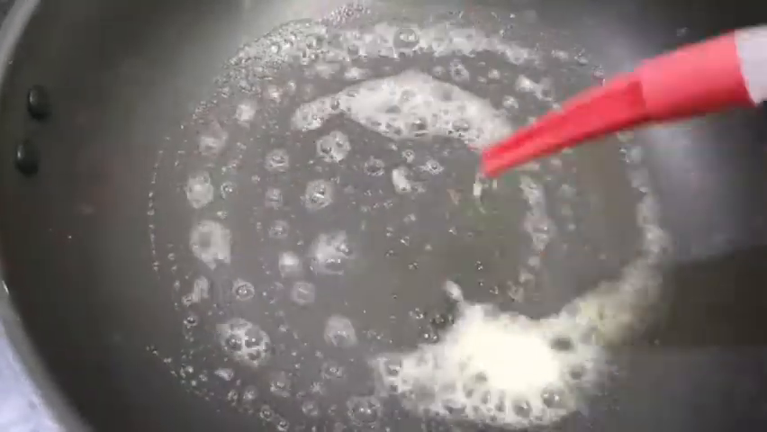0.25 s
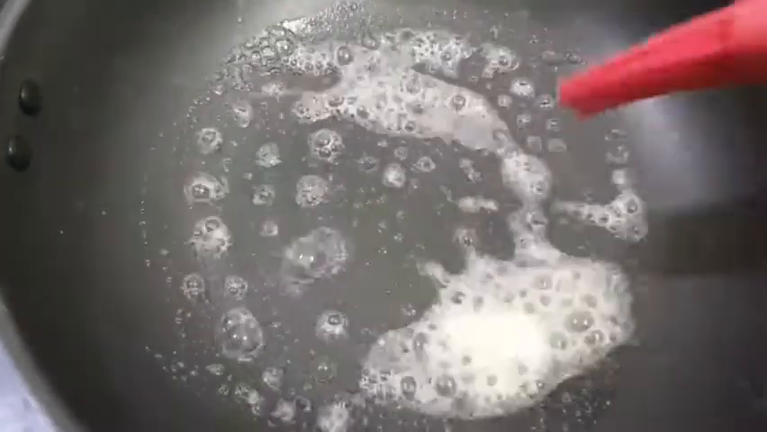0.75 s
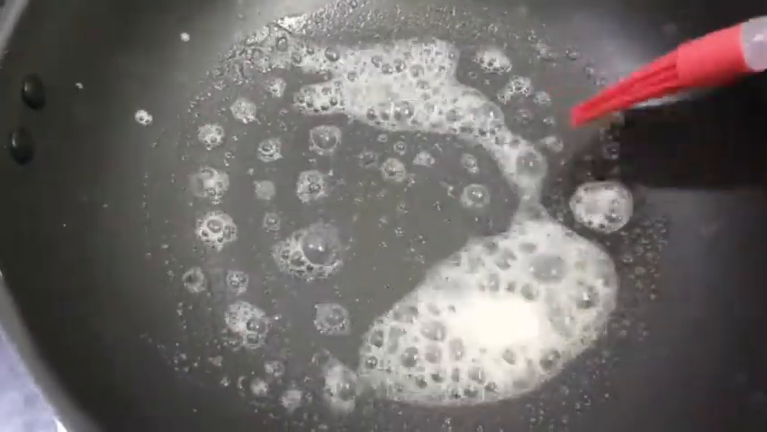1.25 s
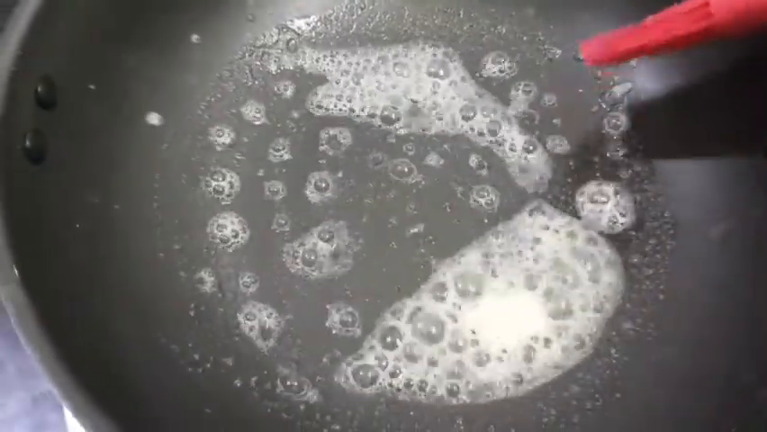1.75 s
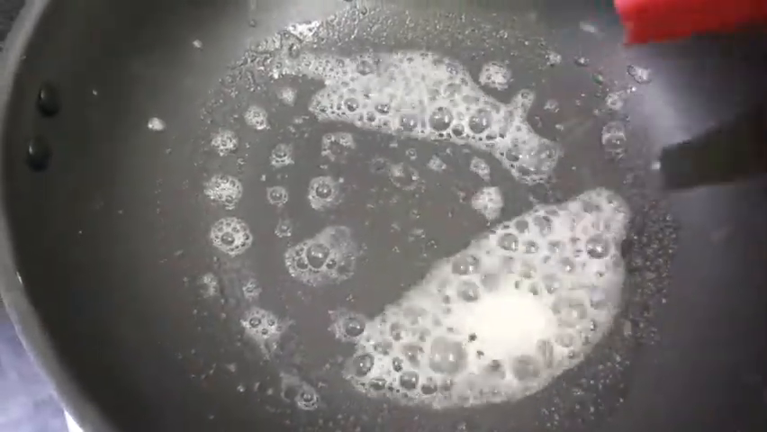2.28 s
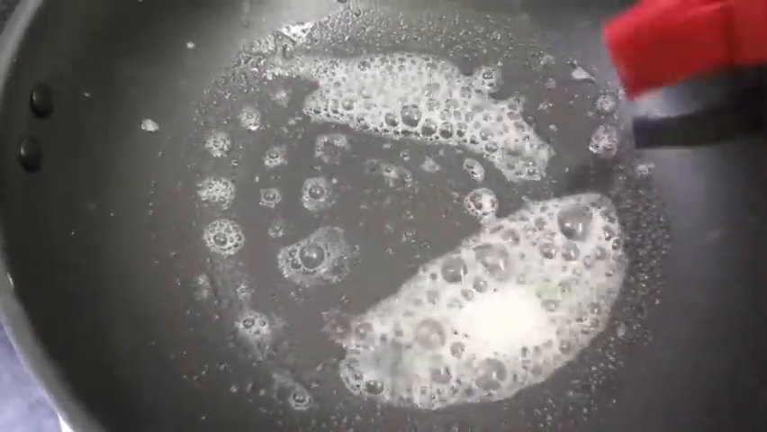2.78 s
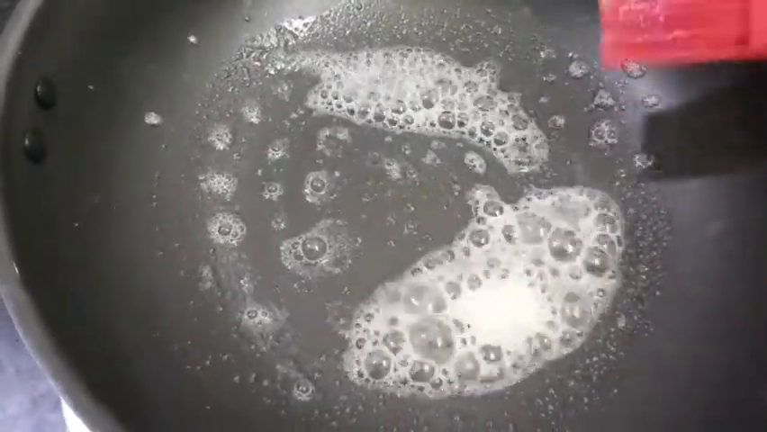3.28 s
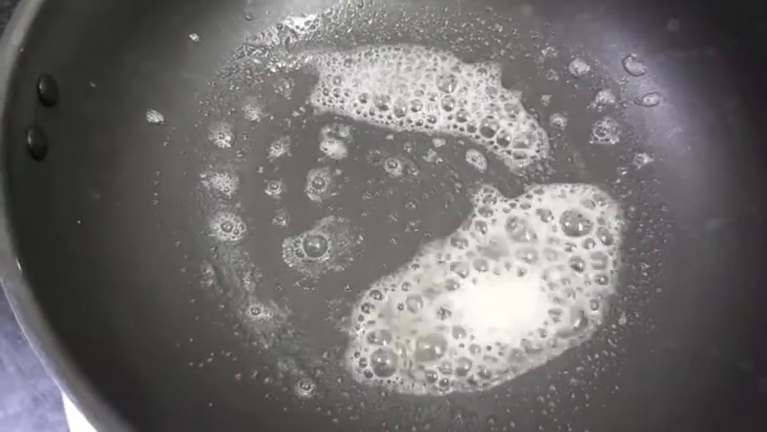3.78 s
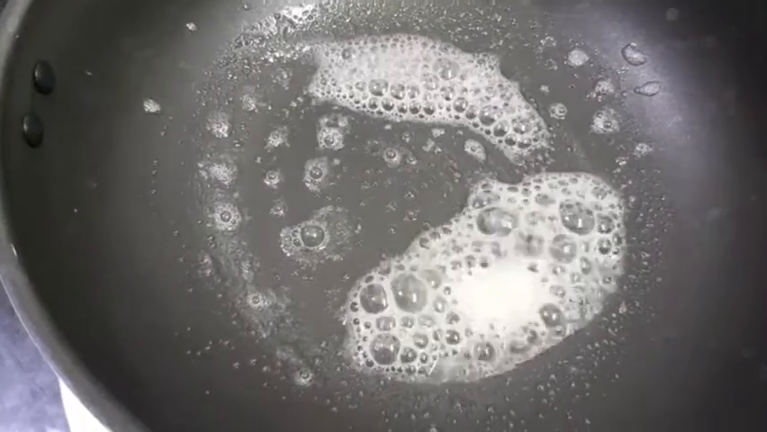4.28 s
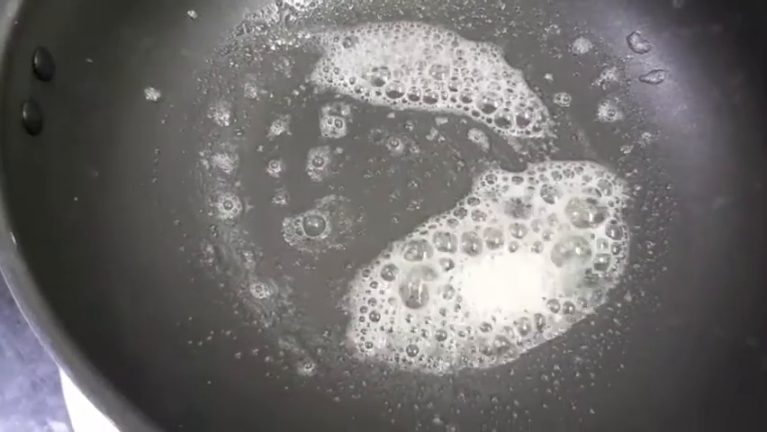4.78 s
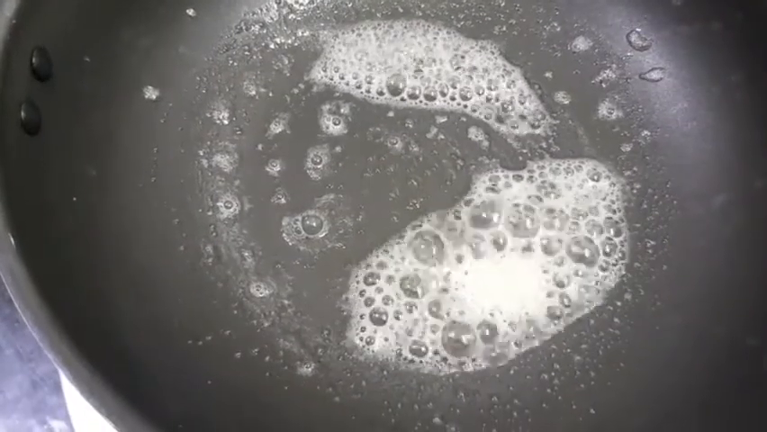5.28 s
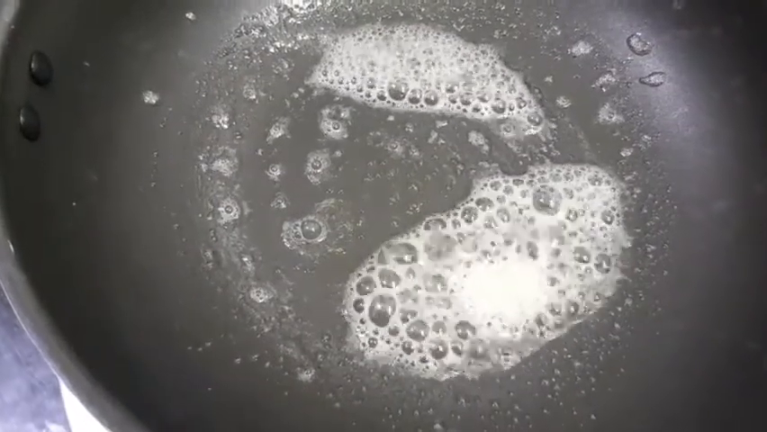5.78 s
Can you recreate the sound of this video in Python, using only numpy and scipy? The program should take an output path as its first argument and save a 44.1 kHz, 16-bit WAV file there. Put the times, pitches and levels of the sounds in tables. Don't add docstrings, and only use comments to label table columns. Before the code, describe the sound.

A close stereo microphone indoors hears butter foaming in a hot pan. From 0 to 1.4 seconds the sizzle is densest, bright and airy, strongest around 0.6, with tiny high snaps and crisp pops; a soft worktop bump falls near 0.36. The fizz then sinks, becoming thin by 3 seconds. Tongs strike the metal rim at about 1.57, 1.76, 1.96, 2.42 and 2.79 seconds: short hard clacks with brief pan ringing, the first loudest, the second brightest, the fourth softest and dull. A faint creak comes near 2.66. From 3 seconds, separate sharp pops crackle over gentle fizz, with small fat spatters at 3.5, 4.6, 5.65 and 5.9. A muffled bump sounds near 4.4. Throughout, a faint low motor hum and drone, swelling slightly around 1.9 and 5.7, and uneven floor rumble sit underneath, with little room echo. The sizzle lifts slightly at the end, near 6 seconds.

```python
import sys
import numpy as np
from scipy import signal
from scipy.fft import rfft, irfft, next_fast_len
from scipy.io import wavfile
from scipy.ndimage import map_coordinates

SR = 44100
rng = np.random.default_rng(int(sys.argv[2]) if len(sys.argv) > 2 else 0)


def amplitude_ratio(level_db):
    exponent = np.asarray(level_db, float) / 20
    return 10 ** exponent


def persist_wave(psi):
    counts = np.round(np.clip(psi, -1, 1) * 32767).astype(np.int16)
    wavfile.write(sys.argv[1], SR, np.atleast_2d(counts).T)


N = 266805

# t/s, peak level/dB, middle ring/dB, bright ring/dB, left-right/dB
KNOCK_EVENTS = [
    (1.5658, -7.5, 3, -4.5, 0),
    (1.7642, -9, 3, -1, 1),
    (1.9608, -9.5, -14, -11.5, 1),
    (2.415, -14, -8, -18, 1.5),
    (2.7898, -9, -3, -4, 1),
]


def unit(x):
    return x / np.sqrt(np.mean(x ** 2) + 1e-20)


def along(points, hz):
    f, v = np.transpose(points)
    return np.interp(np.log(hz + 1), np.log(f + 1), v)


def curves(rows):
    s, *cols = np.transpose(rows)
    return [np.interp(np.arange(N) / SR, s, c) for c in cols]


def wobble(rate_hz):
    knots = rng.standard_normal(int(N * rate_hz / SR) + 4)
    return map_coordinates(knots, [np.arange(N) * rate_hz / SR])


def coloured(x, spectrum):
    n = x.shape[-1]
    m = next_fast_len(n + 8192)
    gain = amplitude_ratio(along(spectrum, np.fft.rfftfreq(m, 1 / SR)))
    return irfft(rfft(x, m) * gain, m)[..., :n]


def rush(spectrum, alike):
    a, b = coloured(rng.standard_normal((2, N)), spectrum)
    turn = np.arccos(np.clip(alike, -1, 1)) / 2
    return unit(np.cos(turn) * a + np.sin(turn) * b * [[1], [-1]])


def sides(left_db, right_db):
    return amplitude_ratio([[left_db], [right_db]])


def bursts(s, hz, size, cycles, pan_db, lag_s):
    out = np.zeros((2, N + 512))
    k = np.arange(128)
    for ch, side in enumerate((.5, -.5)):
        at = np.clip(s - side * lag_s, 0, N / SR) * SR
        age_cycles = np.maximum(k - (at % 1)[:, None], 0) / SR * hz[:, None]
        ring = np.e * age_cycles / cycles * np.exp(-age_cycles / cycles) * np.sin(2 * np.pi * age_cycles)
        weighted = (size * amplitude_ratio(side * pan_db))[:, None] * ring
        place = at.astype(int)[:, None] + k
        out[ch] = np.bincount(place.ravel(), weighted.ravel(), N + 512)
    return out[:, :N]


def bubbles(count, low_hz, high_hz, spread_db, cycles, pan_db):
    when, pitch, size, place = rng.random((count, 4)).T
    hz = np.clip(low_hz * (high_hz / low_hz) ** pitch, 100, SR / 2.2)
    size = amplitude_ratio(-spread_db * np.log(1 - .99 * size))
    lag_s = .0001 + 0.000898 * (place - .5)
    return bursts(when * N / SR, hz, size, cycles, pan_db + 6 * (place - .5), lag_s)


def fizzing(crowd, fizz, side_db, spectrum):
    noise = fizz * sides(side_db, -side_db) * rng.standard_normal((2, N))
    return unit(coloured(unit(crowd) + noise, spectrum))


def foam():
    # t/s, fine bubble level/dB
    boil = [(0.0, -36), (0.32, -37), (0.6, -34), (1.43, -40), (2.59, -45.5), (2.9, -47), (3.3, -47),
            (3.87, -50), (4.72, -49), (5.46, -48.5), (5.91, -48), (6.05, -43)]
    # f/Hz, level/dB per Hz
    large_colour = [(3000, -45), (4000, -11.5), (4800, -8.5), (5500, -7.5), (6200, -4), (7000, -2),
                    (8300, -5.5), (10500, -7), (13000, -8), (20000, -120)]
    fine_colour = [(6000, -33), (9000, -4.5), (11000, -1), (12500, 2), (13900, 3.5), (15000, 3.5),
                   (16500, -4)]
    spit_colour = [(600, -14.5), (1000, -12.5), (1500, -10), (2000, -5.5), (2700, -3), (3400, -3.5),
                   (4000, -3), (4800, 1), (6500, -5.5), (10000, -120)]
    fine_db, = curves(boil)
    excess_db = fine_db + 48
    large_db = -43.5 + 0.47 * excess_db
    spit_db = -46 + 0.46 * excess_db
    flurry_db = .7 * wobble(45) + 1.4 * wobble(160)
    flurry_db = flurry_db * np.clip(1 - .04 * excess_db, .3, 1.1)
    large = bubbles(count=7000, low_hz=4790, high_hz=11000, spread_db=3.5, cycles=0.63, pan_db=9)
    fine = bubbles(count=12000, low_hz=8300, high_hz=17600, spread_db=3.0, cycles=1.0, pan_db=5)
    spit = bubbles(count=5000, low_hz=940, high_hz=3760, spread_db=5.0, cycles=0.41, pan_db=1.5)
    large = fizzing(large, .95, 3.2, large_colour)
    fine = fizzing(fine, .95, 1.7, fine_colour)
    spit = fizzing(spit, 3.18, 1.5, spit_colour)
    large = amplitude_ratio(large_db + flurry_db + .35 * wobble(35)) * large
    fine = amplitude_ratio(fine_db + 4.0 + flurry_db + .35 * wobble(40)) * fine
    return large + fine + amplitude_ratio(spit_db + 1.13 * flurry_db) * spit


def kitchen():
    # f/Hz, rms level/dB, unsteadiness/dB
    hum_lines = [(300.2, -54.5, 2.06), (116.9, -74.5, 8), (59, -68, 4.5)]
    # t/s, drone level/dB
    load = [
        (0.0, -56),
        (1.21, -57),
        (1.92, -51.5),
        (2.27, -55.5),
        (2.54, -54),
        (3.82, -56),
        (5.69, -50),
        (6.05, -51.5),
    ]
    # t/s, level over rumble/dB, half length/s
    steps = [(0.055, 8, .1), (0.97, 10, 0.031), (1.6, 6.5, 0.36), (1.95, 8.5, 0.18), (2.512, 13, 0.047),
             (2.883, 17.5, 0.12), (3.527, 11, 0.056), (3.754, 11, 0.041), (4.156, 11, .12),
             (5.304, 11, 0.13), (5.7, 8.5, 0.71)]
    # f/Hz, level/dB per Hz
    drone_colour = [(100, -32), (150, -10), (200, -9.5), (260, -5), (350, -1.5), (430, -4), (550, -6),
                    (680, -11), (1000, -12.5), (1400, -15.5), (2000, -20), (3000, -120)]
    # f/Hz, level/dB per Hz
    rumble_colour = [(15, -45), (25, -27), (47, -5), (103, -1), (122, -0.5), (145, -16), (160, -6),
                     (210, -56), (350, -120)]
    t = np.arange(N) / SR
    hum = 0
    for hz, db, loose_db in hum_lines:
        level = np.sqrt(2) * amplitude_ratio(db + loose_db * wobble(12))
        hum = hum + level * np.sin(2 * np.pi * hz * t + 0.38 * wobble(9.2))
    drone_db = 3 + curves(load)[0]
    drone = amplitude_ratio(drone_db + 1.06 * wobble(9)) * rush(drone_colour, alike=0.66)
    lumps_db = np.max([db * np.exp(-((t - s) / half_s) ** 2) for s, db, half_s in steps], axis=0)
    rumble_db = -65.5 + 0.78 * t + lumps_db
    rumble = amplitude_ratio(rumble_db) * unit(amplitude_ratio(0.46 * wobble(7)) * rush(rumble_colour, alike=0.95))
    return (hum + rumble) * sides(.6, -.6) + drone * sides(1.2, -1.2)


def singles():
    # t/s, peak level/dB, cavity f/Hz, film snap/dB
    loud_pops = [(0.1, -23, 9430, -12), (0.3006, -17, 7700, -15), (0.412, -17, 9100, -13),
                 (0.9302, -22, 8010, -8), (1.8222, -26, 6720, -3), (1.922, -22.5, 9200, -7),
                 (2.0552, -28, 6700, -19), (2.7222, -28.5, 10000, -4), (2.8754, -29, 6930, -10),
                 (3.0729, -28, 6530, -18), (3.1833, -17, 7700, -14), (3.3805, -25, 6470, -20),
                 (3.5082, -19, 7060, -25), (3.8743, -23.5, 6550, -24), (3.9656, -28, 5930, -11),
                 (4.2107, -20, 7300, -16), (4.285, -28, 6100, -11), (4.4747, -27, 7040, -10),
                 (4.591, -23, 9520, -14), (4.6623, -25.5, 6050, -15), (4.7255, -23.5, 7050, -14),
                 (4.8183, -37, 7150, -6), (5.002, -25, 6900, -15), (5.1277, -21, 6740, -24),
                 (5.3948, -28.5, 6900, -17), (5.5189, -27, 6630, -15), (5.6315, -18.5, 6640, -2.5),
                 (5.6769, -20, 7200, -10), (5.9242, -20, 9900, -13), (5.9904, -20.5, 7350, -14)]
    pan_db = 10
    loud = [(*row, pan_db) for row in loud_pops]
    smacks = [(s + 0.000823, db + bright_db - 1, 6440, -18, side_db + 5.0)
              for s, db, _, bright_db, side_db in KNOCK_EVENTS]
    when, size, pitch, film, place = rng.random((90, 5)).T
    lesser = [when * N / SR,
              -38 - 4.5 * np.log(1 - 0.96 * size),
              7000 * (1.0 + .24 * pitch),
              -11 + 8 * (film - .5),
              pan_db + 9 * (place - .5)]
    return np.concatenate([np.transpose(loud), np.transpose(smacks), lesser], axis=1)


def pops():
    # t/s, peak level/dB, f/Hz
    tiny_snaps = [(0.2603, -23, 13600), (0.3651, -18, 13900), (0.5352, -20, 14100), (0.7966, -21, 14900),
                  (0.85, -24, 12100), (0.9128, -20, 13500), (0.9951, -23, 12100), (1.1583, -14, 13600),
                  (1.2296, -23, 15600), (1.3254, -18, 13400), (1.5349, -27, 14000), (2.0218, -25, 14300),
                  (2.146, -27, 12500), (2.2283, -23, 13600), (2.3685, -19, 15600), (2.4264, -17, 12000),
                  (3.1453, -28, 14300), (3.3513, -22, 13700), (4.0267, -24, 12300), (4.4293, -31, 11900),
                  (4.5475, -27, 11600), (4.6084, -24, 14100), (4.7421, -32, 12300), (4.811, -22, 14300),
                  (5.302, -21, 13900), (5.4326, -21.5, 12200), (5.7618, -25, 14300), (5.9252, -29, 12500)]
    s, db, hz, snap_db, pan_db = singles()
    chance = rng.random((len(s), 3, 4))
    direct = 0
    for step, step_db in enumerate((-5, -3, -7)):
        late, pitch, film, lag = chance[:, step].T
        at = s + 0.000522 + 0.000406 * (step + late)
        lag_s = .0001 + 0.0005 * (lag - .5)
        tear_db = db + step_db
        cavity = bursts(at, hz * (.9 + .2 * pitch), amplitude_ratio(tear_db + 2.5), 0.86, pan_db + 6.0, lag_s)
        snap = bursts(at, 11000 + 4500 * film, amplitude_ratio(tear_db + snap_db + 16.5), 1.5, pan_db - 7.0, lag_s)
        click = bursts(at, 2500 + 2500 * lag, amplitude_ratio(tear_db - 16), 0.44, pan_db + 8.5, lag_s)
        direct = direct + cavity + snap + click
    s, db, hz = np.transpose(tiny_snaps)
    place = rng.random(len(s)) - .5
    direct = direct + bursts(s + 0.00052, hz, amplitude_ratio(db + 4.5), 1.75, 4 + 3 * place, .0001 + 0.0003 * place)
    pan_wall = amplitude_ratio(-11) * np.roll(direct, round(.0026 * SR), axis=1)
    return direct + pan_wall + amplitude_ratio(-16) * walls(direct)


def walls(x):
    # f/Hz, t60/s
    wall_t60 = [(300, 0.82), (1500, 0.25), (6000, 0.38), (12000, 0.07)]
    hz, t, z = signal.stft(rng.standard_normal((2, SR // 2)), SR, nperseg=256)
    decay = amplitude_ratio(-60 * t / along(wall_t60, hz)[:, None])
    tail = signal.istft(z * decay, SR, nperseg=256)[1]
    delayed = np.pad(x, ((0, 0), (300, 0)))
    return signal.fftconvolve(delayed, tail / np.linalg.norm(tail[0]), axes=1)[:, :x.shape[1]]


def bumps():
    # t/s, level/dB, t60/s
    bump_events = [
        (.36, -41, 0.077),
        (4.375, -42.5, 0.39),
    ]
    # f/Hz, level/dB per Hz
    worktop = [(120, -44), (200, -13), (360, -2.5), (705, -9), (780, -12), (895, -6.5), (1800, -22),
               (2340, -55), (3960, -120)]
    # t/s, half length/s, f/Hz, level/dB
    creak = (2.66, .06, 418, -47)
    out = np.zeros(N + SR)
    t = np.arange(SR // 4) / SR
    for s, db, t60 in bump_events:
        thud = unit(coloured(rng.standard_normal(len(t)), worktop))
        envelope = amplitude_ratio(db - 60 * t / t60) * (1 - np.exp(-t / 0.0021))
        out[round(s * SR):][:len(t)] += envelope * thud
    s, half_s, hz, db = creak
    t = np.arange(N) / SR - s
    swell = amplitude_ratio(db + 0.96 * wobble(29.3)) * np.exp(-(t / half_s) ** 2)
    return out[:N] + swell * np.sin(2 * np.pi * hz * t)


def tongs_contact(t, scuff, bright_db):
    # f/Hz, level/dB, t60/s
    tongs_modes = [(733, -16.5, 0.035), (1264, -4.5, 0.045), (1650, -14, 0.023), (1950, -2.5, 0.024),
                   (2675, 0.5, 0.021), (3210, -1, 0.027)]
    scrape = (0.56 * scuff[0] + 0.68 * scuff) * t / 0.0016 * np.exp(-t / 0.0019)
    port_t = t - [[0], [.0001]]
    clack = sum(amplitude_ratio(db - 60 * t / t60) * np.sin(2 * np.pi * hz * port_t) for hz, db, t60 in tongs_modes)
    clack = clack * (1 - np.exp(-t / 0.00076))
    contact = (amplitude_ratio(-5) * scrape + amplitude_ratio(-7) * clack) * sides(3, -3)
    bounce = np.roll(contact, round(.0185 * SR), axis=1)
    return contact + amplitude_ratio(-9 + 0.73 * bright_db) * bounce


def knocks():
    # f/Hz, level/dB, t60/s
    pan_modes = [(187, -27, 0.42), (319.5, -23.5, 0.4), (431, -30, 0.31), (757, -10.5, 0.12),
                 (1046, -14, 0.2), (1253, -4.5, 0.23), (1316, 0, 0.074), (1420, -7, 0.11), (1774, -9, 0.11),
                 (1870, -21, 0.13), (2020, -12, 0.078), (2220, -10, 0.045), (2626, 2, 0.067),
                 (3180, -3.5, 0.12), (3390, -8, 0.091), (6350, -7.5, .1)]
    # f/Hz, level/dB per Hz
    blow = [(300, -62), (600, -10), (950, -17.5), (1270, 0), (1600, -3), (2000, 1.5), (2300, -3),
            (2700, 1.5), (3250, -6), (3900, -11), (5000, -22), (6400, -10), (9500, -13), (13000, -26)]
    # f/Hz, level/dB per Hz
    splash_colour = [(3000, -16), (4200, -0.5), (5100, -2), (6400, -2.5), (8000, -13.5), (10000, -10),
                     (13000, -32)]
    out = np.zeros((2, N + SR))
    t = np.arange(SR // 4) / SR
    hz, level_db, t60 = np.repeat(pan_modes, 3, axis=0).T[:, :, None]
    partner_db = -5 * np.tile([1, 0, 1], len(pan_modes))[:, None]
    level_db = level_db - .6 + 5 * (hz < 500) + partner_db
    hz = hz * (1 + 0.013 * np.tile([-1, 0, 1], len(pan_modes))[:, None])
    for s, db, middle_db, bright_db, pan_db in KNOCK_EVENTS:
        phase, strength, apart = rng.standard_normal((3, 2, len(hz), 1))
        phase = 0.69 * phase[0] + apart * np.clip(hz / 2500, 0, 2)
        spot_db = np.where(hz > 4000, bright_db + 10.5, (middle_db + 4.0) * (hz > 2200))
        mode_level = amplitude_ratio(level_db + spot_db + 0.98 * strength - 60 * t / t60)
        ring = np.sum(mode_level * np.sin(2 * np.pi * hz * t + phase), axis=1)
        scuff, clatter = unit(coloured(rng.standard_normal((2, 2, len(t))), blow))
        contact = tongs_contact(t, scuff, bright_db)
        splash = unit(coloured(rng.standard_normal((2, len(t))), splash_colour))
        splash = amplitude_ratio(bright_db - 16.5 - 60 * t / 0.25) * splash
        tail = amplitude_ratio(-19.5) * ring + splash + amplitude_ratio(-16.0 - 60 * t / 0.15) * clatter
        tail = tail * (1 - np.exp(-t / 0.00078))
        direct = (tail + amplitude_ratio(-0.5) * contact) * sides(pan_db / 2 + 0.84, -pan_db / 2 + 0.5)
        out[:, round(s * SR):][:, :len(t)] += amplitude_ratio(db) * (direct + amplitude_ratio(-10.0) * walls(direct))
    return out[:, :N]


def splats():
    # t/s, rms level/dB, length/s
    splat_events = [
        (3.507, -37, .003),
        (4.59, -32, 0.0037),
        (5.642, -40, 0.0026),
        (5.677, -32, 0.0034),
        (5.926, -44, 0.0015),
    ]
    # f/Hz, level/dB per Hz
    spray_colour = [(500, -36), (1200, -5.5), (2500, -4.5), (4000, 0), (7000, 4), (9500, 1), (13000, -11),
                    (16000, -1)]
    out = np.zeros((2, N + SR))
    t = np.arange(SR // 4) / SR
    for s, db, length_s in splat_events:
        ragged = amplitude_ratio(6.9 * rng.standard_normal(len(t)))
        spray = unit(coloured(rng.standard_normal((2, len(t))) * ragged, spray_colour))
        burst = np.e * t / length_s * np.exp(-t / length_s)
        after = amplitude_ratio(-6.5 - 60 * t / 0.67)
        out[:, round(s * SR):][:, :len(t)] += amplitude_ratio(db) * (burst + after) * spray
    return out[:, :N] * sides(2.5, -2.5)


def scene():
    return foam() + kitchen() + pops() + bumps() + knocks() + splats()


def band_limit(x):
    return signal.sosfilt(signal.butter(12, 17030, fs=SR, output="sos"), x)


def record(dry):
    top_hz = 15850
    limited = coloured(dry, [(top_hz, 0), (top_hz + 60, -45)])
    return band_limit(limited)


dry = scene()
out = record(dry)
persist_wave(out)
```